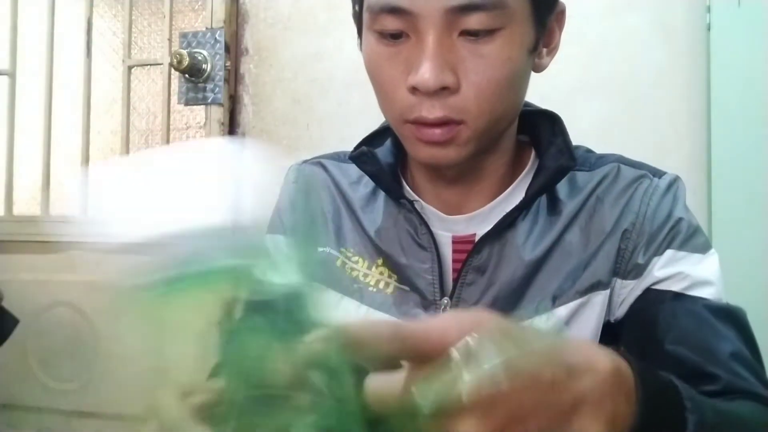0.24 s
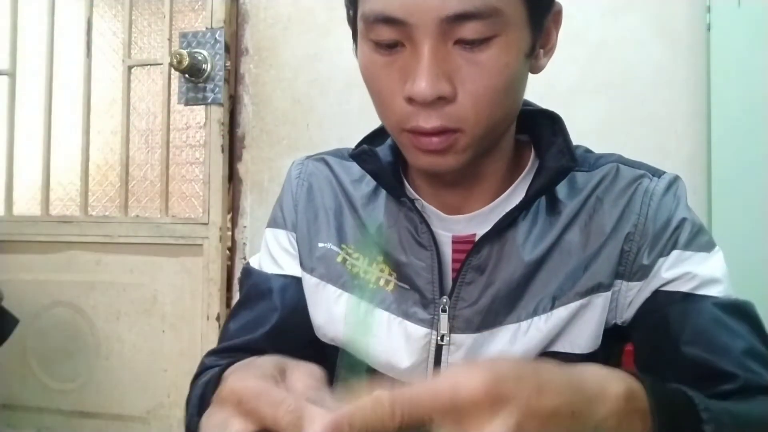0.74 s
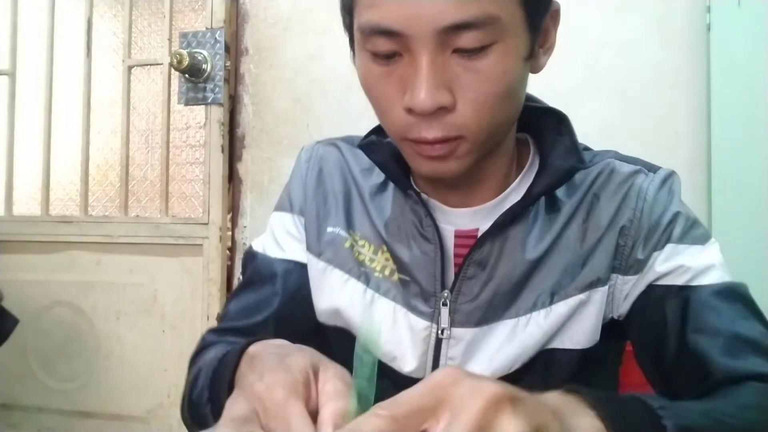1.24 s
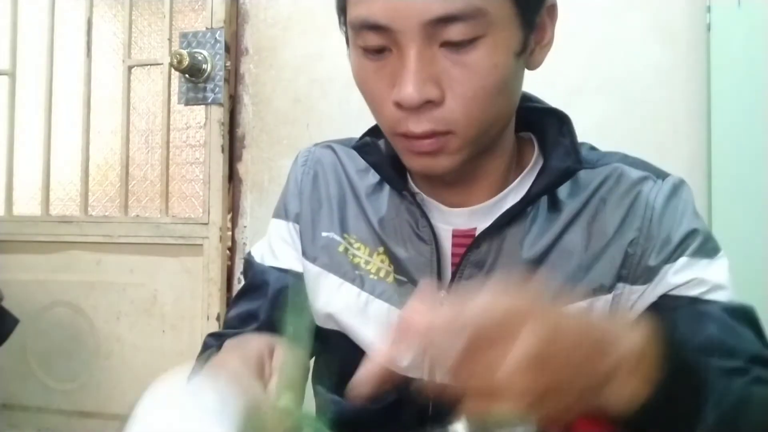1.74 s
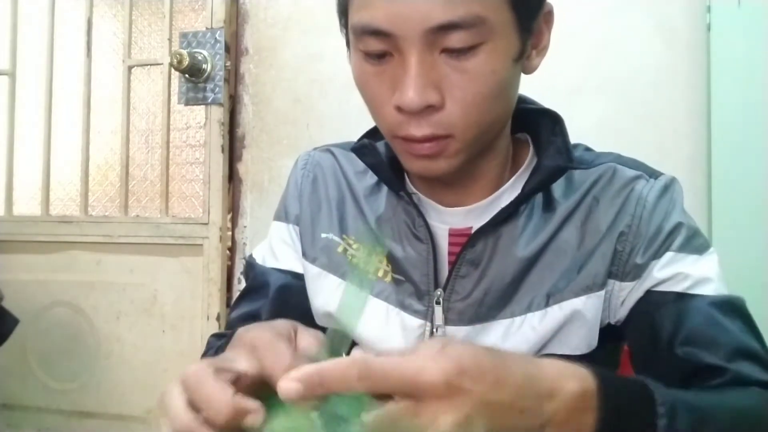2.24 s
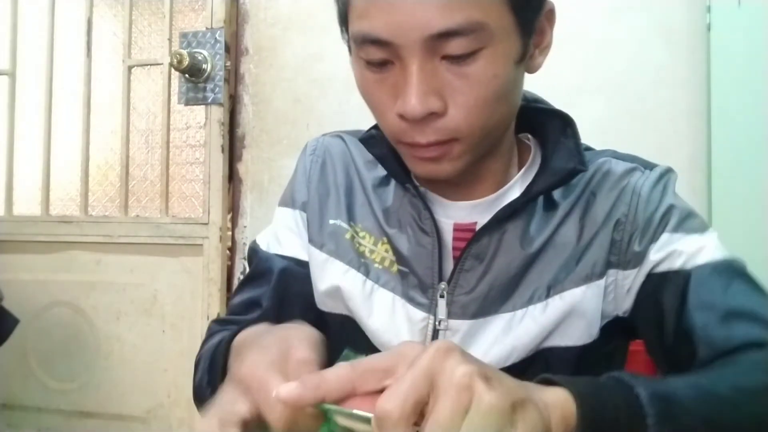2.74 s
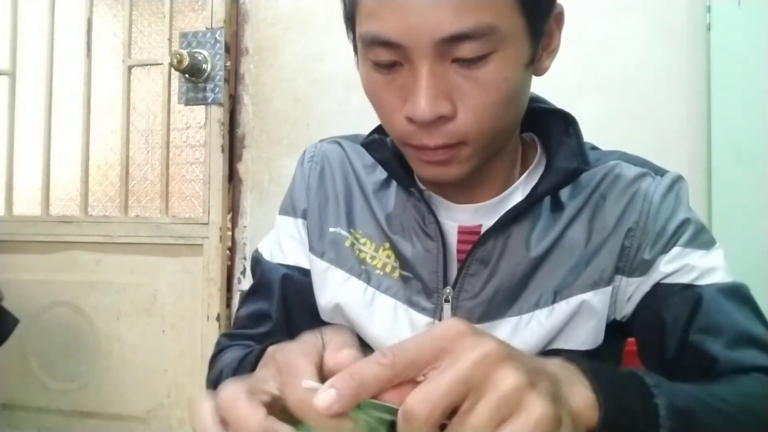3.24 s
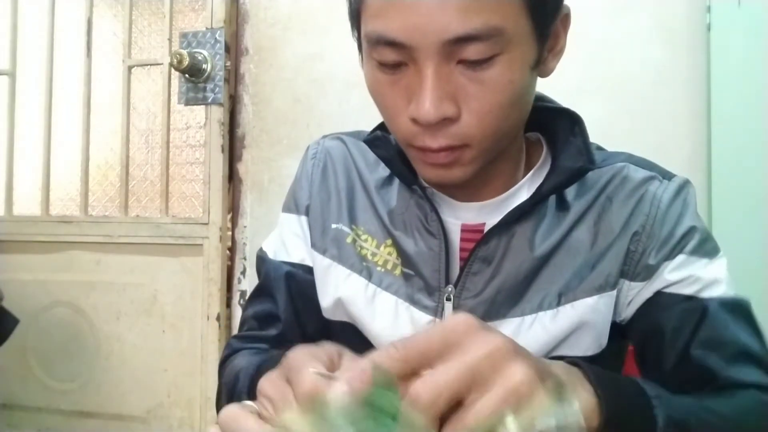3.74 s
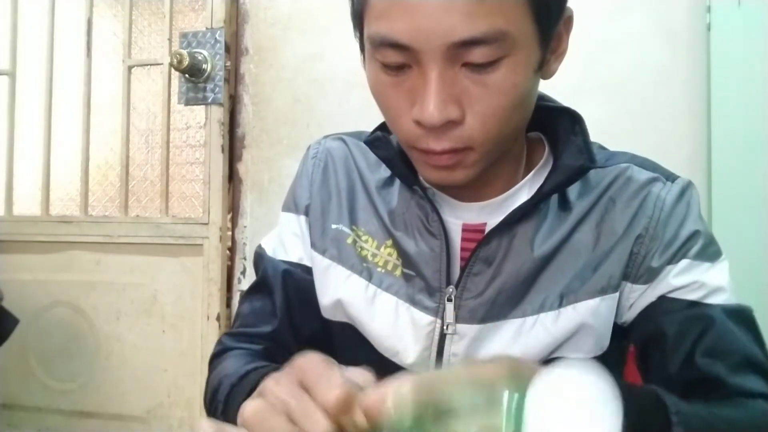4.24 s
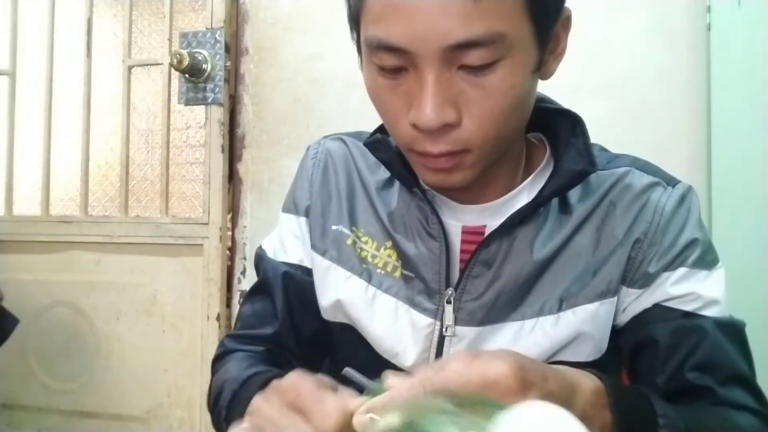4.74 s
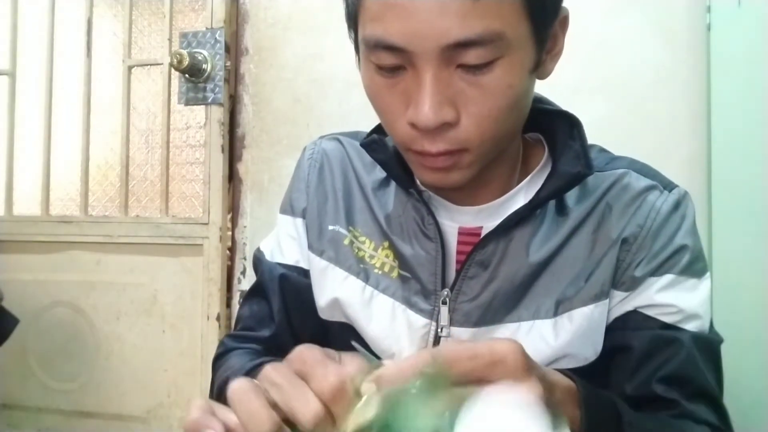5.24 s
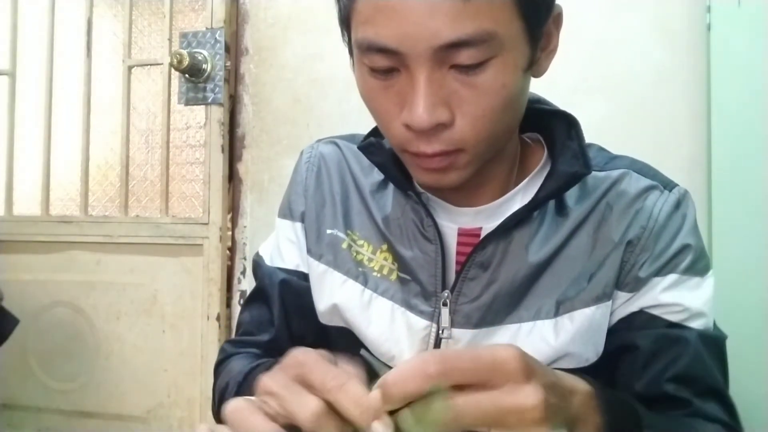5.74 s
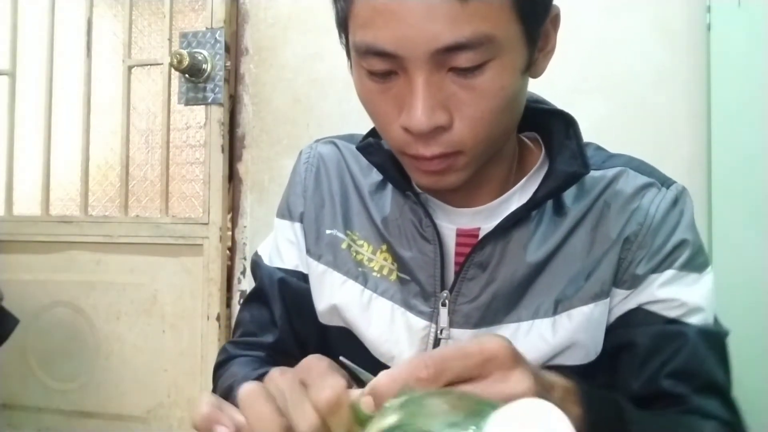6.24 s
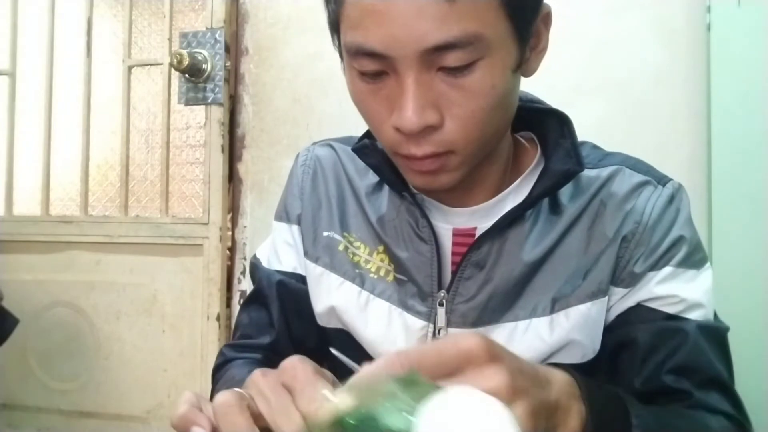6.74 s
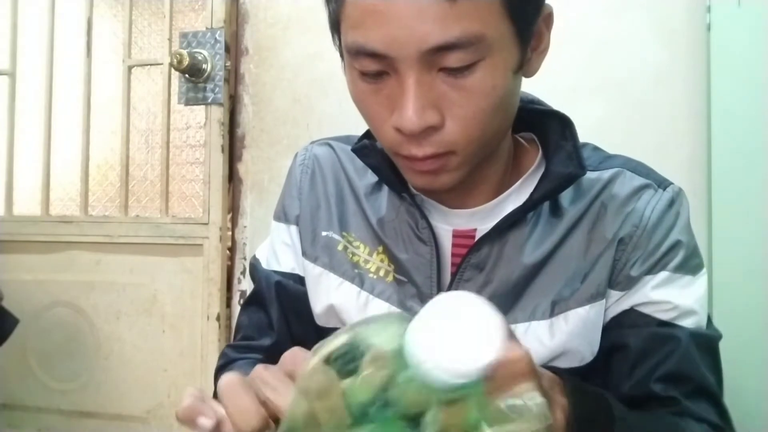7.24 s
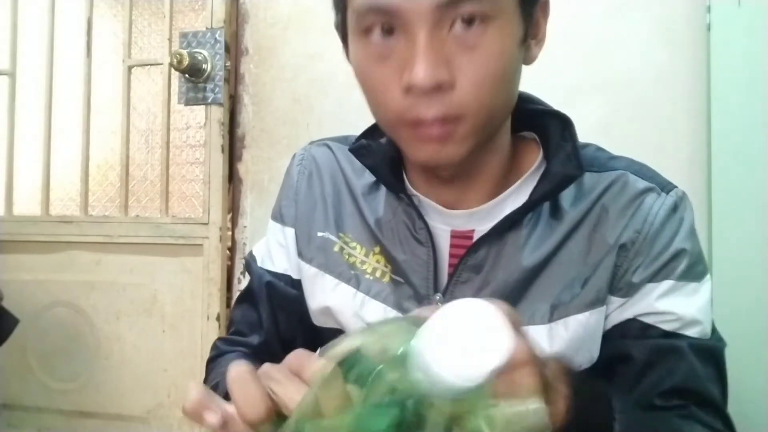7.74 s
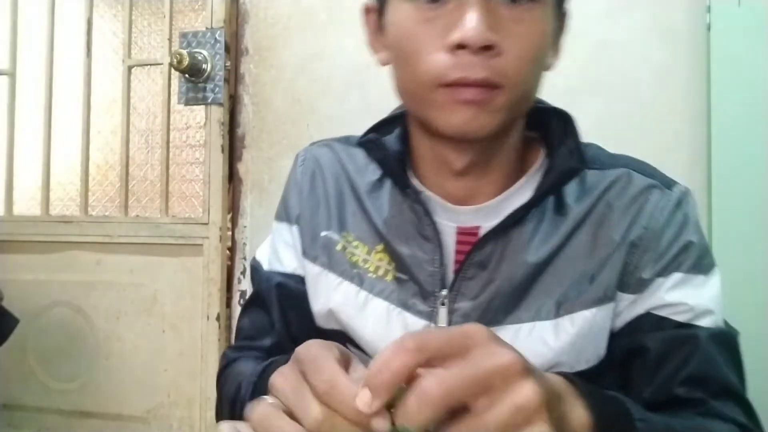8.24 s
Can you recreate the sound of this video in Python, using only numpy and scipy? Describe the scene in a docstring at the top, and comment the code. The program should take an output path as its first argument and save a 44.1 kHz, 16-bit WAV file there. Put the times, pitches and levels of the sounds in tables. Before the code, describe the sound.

Thin stiff plastic strips crackle and snap in irregular bursts as hands work them, with a hollow empty bottle knocking softly in a small room.

```python
"""Thin plastic strips rustle and crackle in squeezes, with sharp snaps over light fingering.
Hands curl the strips, cut from an empty bottle: creases are short noise bursts with pitched notes.
The hollow bottle answers knocks and jolts with decaying modes, and now and then bumps the table.
A small room answers; faint noise and drifting tones lie behind, all through a narrow-band microphone."""
import sys
import numpy as np
from scipy import signal
from scipy.fft import rfft, irfft
from scipy.io import wavfile
from scipy.ndimage import uniform_filter1d

SR = 44100
rng = np.random.default_rng(int(sys.argv[2]) if len(sys.argv) > 2 else 0)


def dump_mix(stems):
    """Bounce the given channels to the path in sys.argv[1] as a 16-bit WAV at rate SR."""
    frames = np.atleast_2d(stems).T  # one column per channel
    limited = np.clip(frames, -1, 1)  # hard clip at full scale
    pcm = np.round(limited * 32767).astype(np.int16)
    wavfile.write(sys.argv[1], SR, pcm)


N = 374409  # length in samples

# modes of the hollow bottle: pitch_hz, level_db, t60_s
BOTTLE_MODES = [(333, -19, 0.03), (415, -1.5, 0.015), (460.6, -11.5, 0.094), (500, -8.5, 0.091),
                (549, 0.5, 0.072), (581, 0, 0.055), (630, -20.5, 0.19), (690.6, -5, 0.1), (869, -1, 0.069),
                (1120, -12.5, 0.28)]
# resonances of the strips, broad and narrow: centre_hz, width_hz, lift_db
STRIP_RESONANCES = [(1130, 195, 5.5), (1735, 14, 6.5), (1820, 56, 4.5), (2010, 280, 6), (2370, 105, 4.5),
                    (3170, 180, 2.5), (4650, 100, -2), (5440, 4370, 4)]
# colour of the microphone: frequency_hz, gain_db
MICROPHONE_COLOUR = [(25, -26), (110, -17.5), (210, -12), (280, 4), (420, 3), (1000, -2.5), (2600, -3),
                     (5000, -2.5), (7300, 2.5), (8200, -13.5), (9600, -29), (12500, -39.5), (15500, -34.5)]


def gain_of(db):
    """Decibels to an amplitude factor."""
    return 10 ** (np.asarray(db) / 20)


def evened(x):
    """Scales to rms 1."""
    return x / np.sqrt(np.mean(x ** 2) + 1e-20)


def read(points, hz):
    """Reads a two-column spectrum table on a log-frequency axis."""
    f, value = np.transpose(points)
    return np.interp(np.log(hz + 1), np.log(f + 1), value)


def add(mix, s, sound):
    """Mixes a sound in at s seconds."""
    part = mix[max(round(s * SR), 0):][:len(sound)]
    part += sound[:len(part)]


def band(x, lo_hz, hi_hz):
    """Gentle causal band-pass."""
    return signal.sosfilt(signal.butter(2, [lo_hz, hi_hz], "band", fs=SR, output="sos"), x)


def causal(db, size=4096):
    """Minimum-phase response of a gain given on the positive bins."""
    log_gain = np.log(gain_of(np.concatenate([db, db[-2:0:-1]])))
    return np.fft.ifft(np.exp(np.conj(signal.hilbert(log_gain)))).real[:size]


def ring(hz, t60, size):
    """A sine that dies by 60 dB in t60 seconds."""
    t = np.arange(size) / SR
    return gain_of(-60 * t / t60) * np.sin(2 * np.pi * hz * t)


def handling_db(t):
    """How hard the strips crackle: the powers of light fingering and of every squeeze add up."""
    # light fingering between the squeezes: time_s, crackle_db
    fingering = [(0, -45), (.16, -75), (.5, -69), (.9, -49), (1.28, -57.5), (1.9, -50.5), (2.75, -55.5),
                 (3.1, -63.5), (3.9, -49), (4.5, -59), (4.7, -48.5), (5.0, -49.5), (5.33, -83),
                 (5.5, -51.5), (6.1, -49.5), (6.5, -50.5), (6.62, -67.5), (6.75, -58), (7.05, -47.5),
                 (7.3, -57.5), (7.48, -54.5), (7.57, -67.5), (7.67, -67), (7.8, -83), (8.05, -45),
                 (8.2, -47), (8.39, -49.5)]
    # squeezes that swell, hold and die away: start_s, hold_s, crackle_db
    squeezes = [(0.034, 0.027, -43.5), (0.189, 0.064, -42.5), (0.364, 0.013, -43), (0.456, .02, -46.5),
                (0.527, 0.012, -46), (0.602, 0.17, -41.5), (1.12, 0.097, -47), (1.312, 0.065, -35.5),
                (1.432, 0.14, -40.5), (1.689, 0.074, -39.5), (1.922, 0.061, -42.5), (2.184, 0.05, -38.5),
                (2.307, 0.12, -42.5), (2.468, 0.041, -41.5), (2.592, 0.089, -43.5), (2.797, 0.0078, -42),
                (2.856, 0.1, -45), (3.127, 0.32, -41), (3.466, 0.18, -39.5), (3.616, 0.13, -52),
                (3.946, 0.034, -41.5), (4.04, 0.008, -45), (4.165, 0.011, -44.5), (4.255, 0.074, -39),
                (4.421, 0.023, -51.5), (4.53, 0.022, -41.5), (5.072, 0.023, -44.5), (5.183, 0.056, -53),
                (5.344, 0.011, -51.5), (5.55, 0.054, -44.5), (5.657, 0.037, -34.5), (5.845, 0.016, -47.5),
                (5.922, 0.0085, -48.5), (6.111, 0.0055, -46), (6.3, 0.025, -38.5), (6.431, 0.07, -45),
                (6.726, 0.018, -46), (6.817, 0.018, -41), (6.912, 0.06, -41), (7.371, 0.021, -45),
                (7.707, 0.014, -45), (7.821, 0.063, -43.5), (7.925, 0.025, -40.5), (8.229, 0.015, -38),
                (8.4, 0.091, -41)]
    swell_s, swell_db, die_db_per_s = 0.024, 14, 199.5

    power = gain_of(2 * np.interp(t, *np.transpose(fingering)))
    for start, hold, db in squeezes:
        rise_db = swell_db * np.minimum((t - start) / swell_s - 1, 0)
        fall_db = die_db_per_s * np.maximum(t - start - swell_s - hold, 0)
        power = power + gain_of(2 * (db + rise_db - fall_db))
    return 10 * np.log10(power)


def clicks(per_s, spread_db, clump_db):
    """Sparse clicks of very unequal size that come in clumps."""
    clumps = gain_of(clump_db * evened(uniform_filter1d(rng.standard_normal(N), 500)))
    size = gain_of(spread_db * np.minimum(rng.exponential(1, N), 3)) * rng.choice([-1, 1], N)
    return size * (rng.random(N) < per_s * clumps / SR)


def buckles(chance, low_db, high_db, last_s, rise_s):
    """A crease as a lumpy noise burst of tiny buckles, which drops to a weaker decay around last_s."""
    t = np.arange(chance.shape[1]) / SR
    lumps = gain_of(3.44 * evened(uniform_filter1d(chance[1], 40)))
    run = gain_of(-60 * t / 0.088) * (gain_of(-3.5) + 1 / (1 + (t / last_s) ** 6))
    burst = chance[0] * lumps * (1 - np.exp(-t / rise_s)) * run
    # each crease splits its colour at other frequencies
    a, b = np.array([2600, 5000]) * np.exp(.16 * chance[1, :2])
    parts = [band(burst, 800, a), band(burst, .8 * a, b), band(burst, .8 * b, 18000)]
    low, middle, high = (p / abs(p).max() for p in parts)
    return gain_of(low_db) * low + gain_of(2.0) * middle + gain_of(high_db + 7) * high


def bottle_ring(centre_hz, chance, thud_db):
    """Modes near the jolted pitch region speak loudest, and the grip detunes them a little; peak 1."""
    hz, db, t60 = np.transpose(BOTTLE_MODES)[:, :, None]
    t = np.arange(6144) / SR
    db = db + 4.16 * chance[:, :1] - 30 * abs(np.log2(hz / centre_hz))
    detuned_hz = hz * (1 + 0.021 * chance[:, 1:])
    modes = gain_of(db - 60 * t / t60) * np.sin(2 * np.pi * detuned_hz * t)
    sound = modes.sum(0) * (1 - np.exp(-t / 0.0062))  # the hollow body takes a moment to speak
    # dull thud of the whole bottle
    sound = sound + gain_of(thud_db) * abs(sound).max() * ring(163, 0.022, len(t))
    return sound / abs(sound).max()


def crackle(count=30):
    """Many small creases with varied colours and notes; some of them jolt the bottle into ringing."""
    control_s = np.arange(0, N + 128, 128) / SR
    crackle_db = handling_db(control_s)
    t = np.arange(N) / SR

    # hard squeezes crease more places at once
    dense = gain_of(.8 * np.clip(np.interp(t + .01, control_s, crackle_db) + 44.5, -8, 14))
    train = clicks(per_s=220 * dense, spread_db=4.0, clump_db=3.5) / np.sqrt(dense)

    patch = rng.integers(0, count, N)
    colours_db = 12.9 * rng.standard_normal((count, 2)) - [6.0, 7.0]
    resonances_hz = np.transpose(STRIP_RESONANCES)[0]
    notes_hz = rng.choice(resonances_hz, count) * np.exp(0.047 * rng.standard_normal(count))
    fizz = np.zeros(N)
    for k, ((low_db, high_db), hz) in enumerate(zip(colours_db, notes_hz)):
        chance = rng.standard_normal((2, 1024))
        burst = buckles(chance, low_db, high_db, last_s=0.0058, rise_s=rng.uniform(0.0011, 0.0088))
        crease = evened(burst + gain_of(-5.0) * ring(hz, 0.0017 + 30 / hz, 1024))
        fizz += signal.oaconvolve(train * (patch == k), crease)[:N]

    place = rng.integers(0, count, N)
    jolt_gain = gain_of(np.interp(t + 0.017, control_s, crackle_db) - 11)
    jolts = train * (rng.random(N) < .55) * jolt_gain
    regions_hz = 560 * np.exp(0.2 * rng.standard_normal(count))
    body = np.zeros(N)
    for k, hz in enumerate(regions_hz):
        answer = bottle_ring(hz, rng.standard_normal((len(BOTTLE_MODES), 2)), thud_db=-17)
        body += signal.oaconvolve(jolts * (place == k), answer)[:N]

    # skin sliding on the plastic
    rustle = band(clicks(per_s=4000, spread_db=5.0, clump_db=2.5), 800, 12000)
    strips = evened(fizz) + gain_of(-11.5) * dense ** 0.67 * evened(rustle)
    return strips * gain_of(np.interp(t + 0.0059, control_s, crackle_db) - 3.5) + body


def background():
    """Spectrally shaped room noise, and slowly gliding, wavering sines from outside."""
    # spectrum of the room noise, only its shape counts: frequency_hz, density_db (per Hz)
    noise_shape = [(120, -22.5), (200, 14), (653, 11.5), (819, -12.5), (1080, 20.5), (1440, -38),
                   (7500, -95), (9750, -45), (16500, -120)]
    # faint tones that drift in and out: start_s, end_s, first_hz, last_hz, level_db (rms)
    tones = [(0, .42, 302, 325, -70), (6.68, 7.75, 264, 274, -71.5), (7.2, 7.6, 341, 339, -72)]

    shape_gain = gain_of(read(noise_shape, np.fft.rfftfreq(N, 1 / SR)))
    noise = irfft(rfft(rng.standard_normal(N)) * shape_gain, N)
    out = gain_of(-67.5) * evened(noise)
    slow = uniform_filter1d(uniform_filter1d(rng.standard_normal(N), 2500), 1500)
    waver_db = 2.5 * evened(slow)
    for start, end, first_hz, last_hz, db in tones:
        t = np.arange(0, end - start, 1 / SR)
        # the same waver, read backwards, unsteadies the pitch by a few Hz
        pitch_hz = np.linspace(first_hz, last_hz, len(t)) + .8 * waver_db[::-1][:len(t)]
        turns = np.cumsum(pitch_hz) / SR
        fade = np.minimum(np.minimum(t, t[::-1]) / 0.028, 1)
        level = gain_of(db + waver_db[round(start * SR):][:len(t)]) * np.sqrt(2)
        add(out, start, level * fade * np.sin(2 * np.pi * turns))
    return out


def knocks():
    """Fingers and strips knock the hollow bottle, and its modes ring after each knock."""
    # knocks on the bottle: time_s, level_db (relative), region_hz (the pitch region that answers most)
    knock_list = [(0.042, -40, 549), (0.074, -34.5, 620), (0.195, -43, 625), (0.212, -33, 535),
                  (0.319, -37.5, 540), (0.476, -33, 505), (0.545, -38.5, 570), (0.572, -33, 600),
                  (0.65, -35, 546), (0.677, -32.5, 566), (0.72, -28.5, 585), (0.754, -34.5, 574),
                  (0.784, -37.5, 560), (0.882, -40.5, 506), (0.916, -35.5, 530), (1.017, -36, 546),
                  (1.109, -34, 590), (1.17, -36, 549), (1.23, -38, 576), (1.274, -42.5, 560),
                  (1.308, -30.5, 530), (1.337, -21, 660), (1.341, -28.5, 432), (1.359, -22, 695),
                  (1.397, -36, 570), (1.515, -34, 443), (1.569, -31, 560), (1.677, -28, 570),
                  (1.695, -26, 556), (1.749, -34.5, 636), (1.941, -43, 549), (1.963, -31, 564),
                  (2.03, -31, 564), (2.092, -42, 616), (2.202, -34, 584), (2.246, -27, 546),
                  (2.374, -32.5, 549), (2.494, -34, 550), (2.573, -40, 540), (2.64, -34.5, 600),
                  (2.948, -49, 573), (2.965, -33, 490), (2.992, -38, 496), (3.247, -29.5, 589),
                  (3.376, -35.5, 615), (3.406, -31, 530), (3.47, -33, 604), (3.49, -39, 530),
                  (3.611, -31, 570), (3.661, -36, 574), (3.697, -26.5, 557), (3.722, -31.5, 555),
                  (3.88, -35.5, 560), (4.051, -36.5, 580), (4.145, -37, 530), (4.168, -34, 537),
                  (4.345, -33.5, 540), (4.518, -35.5, 540), (4.558, -32, 543), (4.587, -39, 540),
                  (4.671, -36.5, 547), (4.7, -47, 530), (4.722, -39, 540), (4.778, -33.5, 576),
                  (4.845, -32, 570), (4.884, -36.5, 557), (4.938, -32, 552), (5.017, -39.5, 555),
                  (5.045, -42.5, 584), (5.206, -32.5, 540), (5.343, -31.5, 555), (5.446, -45.5, 546),
                  (5.565, -38.5, 566), (5.605, -33.5, 549), (5.679, -33, 493), (5.718, -42, 600),
                  (5.85, -39, 540), (5.933, -34.5, 460), (6.073, -36.5, 535), (6.14, -33, 550),
                  (6.255, -36, 546), (6.334, -30, 590), (6.442, -36, 550), (6.687, -48, 549),
                  (6.726, -46, 540), (6.915, -33, 549), (6.962, -32.5, 550), (7.068, -31, 530),
                  (7.134, -37, 506), (7.229, -39.5, 560), (7.354, -37.5, 544), (7.406, -34, 557),
                  (7.466, -38.5, 549), (7.603, -38, 556), (7.693, -47, 447), (7.947, -40, 470),
                  (7.983, -31, 596), (8.108, -33.5, 630), (8.252, -30, 564), (8.316, -32.5, 570),
                  (8.41, -41.5, 540), (8.445, -33.5, 563)]
    out = np.zeros(N)
    chance = rng.standard_normal((len(knock_list), len(BOTTLE_MODES), 2))
    for k, (s, db, hz) in enumerate(knock_list):
        add(out, s, gain_of(db - 3.5) * bottle_ring(hz, chance[k], thud_db=-13))
    return out


def snaps():
    """A burst of buckles plus the note of the snapping patch; low and strong notes ring longer."""
    # clear snaps: time_s, level_db (relative), low_crack_db and high_crack_db (colour trims),
    # pitch_hz (of the snapping patch), note_db (relative to level_db)
    snap_list = [(.2053,-26.5,-10,-6,6800,-6.5),(.243,-26,-4.5,0.5,4500,-2),(.2758,-31.5,-2,1,1120,-24),(.3132,-34,-3,9,6030,-12),(.373,-43,-7,7.5,6300,1),(.4256,-36,2,1.5,2190,-18),(.466,-40,5,-6,1120,-16),(.5655,-27.5,-5.5,-3.5,1970,-22),(.63,-31,-1,6.5,3420,5.5),(.6738,-28,-11,-2.5,1120,-16),(.7067,-29,-0.5,4,1983,-6.5),(.9144,-49,11,3.5,1760,-12),(.9703,-40,6.5,1,1980,-6),(1.013,-36.5,1.5,0,1920,-13),(1.06,-25,-6,-11.5,1120,-17.5),(1.106,-23.5,-5.5,-2,1147,-25),(1.1613,-37.5,-6,0.5,2030,-17),(1.2298,-41.5,-9,-9,1110,1.5),(1.264,-31.5,-23,-3,1120,-17),(1.3135,-36,-3,4.5,7240,-25),(1.3382,-19.5,-1.5,4,2206,-9),(1.3653,-21,-4,2,4020,0),(1.4364,-34,-15,2,5940,-4),(1.4667,-28,-4,0,1244,-9),(1.4954,-30,-5,4.5,1860,-12),(1.5136,-25.5,-2,-2.5,6900,-10),(1.5376,-22,1.5,-4,1140,-20),(1.6193,-29.5,-10,-6.5,3170,1),(1.6755,-40,10,-4,871,7.5),(1.698,-28.5,-4,-2,6700,-5),(1.7457,-36.5,-14,-4,1094,-5),(1.9432,-35.5,-19,-19,2000,-7),(1.9909,-30.5,-3,-1,1900,-13),(2.091,-41.5,1,-3,1870,-6),(2.1961,-27,-7,0,2900,-14),(2.2423,-32,-10,-1,1310,-19),(2.3236,-34.5,1,-5,2020,-5.5),(2.367,-29,-4,-1.5,4130,-15),(2.4906,-30.5,-7,-1,1770,-7),(2.5096,-24.5,-7,0.5,6350,-9),(2.5717,-27.5,-10,4.5,6340,-20),(2.6716,-27.5,-5,0.5,2850,-7),(2.8023,-42,-13,-6,1120,-4),(2.8477,-47,11,-9,1950,-18),(2.899,-27,-10,-0.5,3230,-9),(2.9422,-36.5,2,-1,1130,-6.5),(3.1568,-36,-3,-24,1280,-7),(3.2296,-37.5,-10,8,6200,4),(3.2578,-31,-8,2,5400,-3),(3.27,-25,-11,1,7100,-21),(3.3361,-26.5,-6,-2.5,2900,-4),(3.4615,-25.5,-1.5,-1,2050,-15),(3.497,-32.5,-1,-7,4060,-7),(3.5273,-33,-12,3,1970,-4),(3.5484,-28.5,-7,-0.5,3110,-4),(3.6054,-37,-12,5,1070,-5),(3.6381,-28,-9,1.5,2040,-9),(3.6592,-32,-3,8.5,2000,-8),(3.7194,-31.5,0.5,-0.5,1990,-4.5),(3.7567,-32.5,-1,-4,3030,-9),(3.8684,-38,-2,-27,1130,-9),(3.9692,-35.5,-6,5,3900,-3),(3.981,-29,-1.5,-3,3570,-8),(4.162,-37,-3,-4,1934,-7),(4.1759,-30.5,-5,6.5,7060,0),(4.2615,-25.5,2.5,-2.5,3790,-1),(4.3175,-33.5,-9,0,1780,-16),(4.371,-43,-11,0,1975,1),(4.43,-39.5,1,4,1060,-10),(4.5178,-38.5,5,-0.5,1120,-9),(4.553,-36,5,4,1810,-7.5),(4.581,-28,-3,-1.5,4930,-3.5),(4.721,-43,7.5,-18,1130,-5),(4.738,-49,-6,6,1960,0),(4.774,-42.5,6.5,-16,1130,-4),(4.8443,-38,6,-1.5,1130,-10),(4.9126,-34,-4,-1,1130,-19),(4.9352,-34,-15,6,1858,7.5),(5.015,-34.5,-4,-3,1100,-26),(5.1637,-39,4.5,2,1920,-24),(5.2,-46,0.5,-19,1110,-9),(5.3405,-32,1.5,-3.5,2295,-5),(5.4237,-42.5,1,2.5,1130,-10),(5.5807,-33.5,-2,-1,2020,-22),(5.671,-28,-24,0.5,3770,1),(5.718,-24,-4,1.5,2220,-12),(5.8286,-44,-14,0,2370,-14),(5.8487,-48.5,3,-6,1160,3),(5.89,-44.5,-3,-20,2100,5),(5.9347,-30,-12,-1,1970,-10),(6.0658,-34,-2,-1.5,2430,-18),(6.182,-39,-2,3.5,1100,-5),(6.2282,-41,-7,-24,1145,-5),(6.323,-37,8.5,-8,1860,-21),(6.336,-31.5,-2,0.5,1980,-3),(6.43,-39,-11,6,6400,-8),(6.512,-38.5,5,3.5,1120,-4),(6.6824,-53,-3,1,1080,-5),(6.7434,-52,6.5,1,2530,-10),(6.8337,-40,1,-27,2400,-4),(6.9385,-37,-21,0,2130,-7),(6.9604,-28,-17,-6,2780,-4),(7.127,-35,-4,-4,2300,-8),(7.1861,-41,-3,-4,2370,-5),(7.3772,-39,1.5,-2.5,1090,-12),(7.5986,-48.5,2,2.5,1200,-12),(7.689,-53,7.5,1,1075,-4),(7.879,-31.5,-9,1,4380,-1),(7.9384,-32.5,-3,-9,3640,-4),(7.9787,-35.5,-20,2,1120,-7.5),(8.1384,-36.5,-4,-27,1050,-10),(8.194,-42.5,1,-2,1880,-18),(8.2418,-34,5,3.5,5160,4),(8.433,-28.5,-15,-2,3170,-6)]
    out = np.zeros(N)
    chance = rng.standard_normal((len(snap_list), 2, 2048))
    swell = np.minimum(np.arange(4096) / SR / 0.0011, 1) ** 2  # the note opens within 1.1 ms
    for k, (s, db, low_db, high_db, hz, note_db) in enumerate(snap_list):
        burst = buckles(chance[k], low_db, high_db, last_s=0.0084, rise_s=0.001)
        add(out, s - .0006, gain_of(db + 1.0) * burst)

        t60 = (0.006 + 12 / hz) * gain_of(0.11 * max(note_db, 0))
        # faint long aftertone, beating with a partner slightly below the note
        pair = ring(hz, 12 * t60, 4096) + .6 * ring(hz * .94, 9 * t60, 4096)
        after = gain_of(-17 - 4 * np.log2(hz / 1500)) * pair
        add(out, s, gain_of(db + note_db + 6.5) * swell * (ring(hz, t60, 4096) + after))
    return out


def bumps():
    """The bottle meets the table: dull low knocks, each one short dying sine."""
    # bumps: time_s, level_db (as heard through the microphone colour), pitch_hz
    bump_list = [(0.209, -57, 158), (0.615, -56.5, 163), (1.312, -52, 290), (1.342, -39.5, 159),
                 (1.359, -56, 292), (1.425, -62, 114), (1.484, -33.5, 290), (1.49, -50, 121),
                 (1.519, -27.5, 403), (1.552, -35.5, 295), (2.648, -46, 310), (4.168, -41, 344),
                 (7.483, -61, 101)]
    out, t = np.zeros(N), np.arange(4096) / SR
    for s, db, hz in bump_list:
        boost_db = -read(MICROPHONE_COLOUR, hz)  # makes up for the microphone's loss or gain here
        add(out, s, gain_of(db + boost_db) * ring(hz, 0.052, 4096) * (1 - np.exp(-t / 0.00018)))
    return out


def strip_colour(x):
    """Lifts or dips the resonances of the strips, broad and narrow."""
    hz = np.fft.rfftfreq(8192, 1 / SR)
    db = sum(g / (1 + (2 * (hz - f) / w) ** 2) for f, w, g in STRIP_RESONANCES)
    return signal.oaconvolve(x, causal(db))[:N]


def room_answer(early_db, late_db):
    """Table and walls throw back a few taps within 10 ms, and a short dense tail starts at 7 ms."""
    # decay of the small room: frequency_hz, t60_s
    room_decay = [(200, 0.67), (1000, 0.36), (4000, 0.15), (10000, 0.22)]
    early = np.zeros(SR // 2)
    early[rng.integers(40, 440, 9)] = rng.choice([-1., 1.], 9) / 3
    taps = np.zeros(SR // 2)
    at = np.arange(300, SR // 2 - 20, 20)
    taps[at + rng.integers(0, 20, len(at))] = rng.choice([-1., 1.], len(at))
    hz, t, z = signal.stft(taps, SR, nperseg=256)
    decay = gain_of(-60 * t / read(room_decay, hz)[:, None])
    tail = signal.istft(z * decay, SR, nperseg=256)[1][:SR // 2]
    return gain_of(early_db) * early + gain_of(late_db) * tail / np.linalg.norm(tail)


def room(x, count=6):
    """The hands keep moving, so the echoes crossfade from one pattern to the next."""
    place = np.arange(N) / SR * 9.0 % count  # nine patterns a second, in a cycle
    out = x.copy()
    for k in range(count):
        distance = abs((place - k + count / 2) % count - count / 2)
        share = np.cos(np.pi / 2 * np.minimum(distance, 1))
        out += signal.oaconvolve(x * share, room_answer(early_db=-17.5, late_db=-9.0))[:N]
    return out


def suppress(x):
    """A noise suppressor turns the quietest moments further down."""
    power_db = 10 * np.log10(abs(uniform_filter1d((x ** 2).mean(0), 600)) + 1e-12)
    cut_db = 0.55 * np.minimum(power_db + 54, 0)  # acts below -54 dB
    return x * gain_of(uniform_filter1d(cut_db, 300))


def scene():
    """Strips, bottle and table in the room over the background, the same in both channels."""
    strips = strip_colour(snaps() + knocks() + crackle())
    mono = room(strips + bumps()) + background()
    return np.array([mono, mono])


def record(dry):
    """Microphone colour with its fall above 7 kHz, noise suppressor, then the band limit."""
    colour = causal(read(MICROPHONE_COLOUR, np.fft.rfftfreq(8192, 1 / SR)))
    heard = suppress(signal.oaconvolve(dry, colour[None])[:, :N])
    band_limit = signal.firwin(511, 15750, window=("kaiser", 9), fs=SR)  # low-pass edge in Hz
    return signal.oaconvolve(heard, band_limit[None], "same")


dry = scene()
out = record(dry)
dump_mix(out)
```